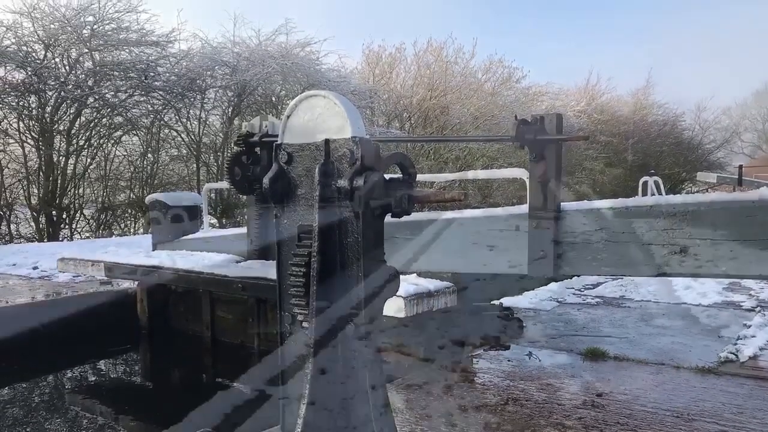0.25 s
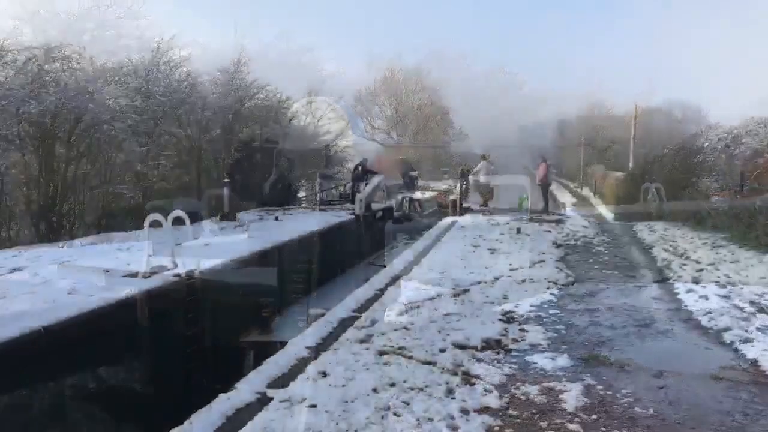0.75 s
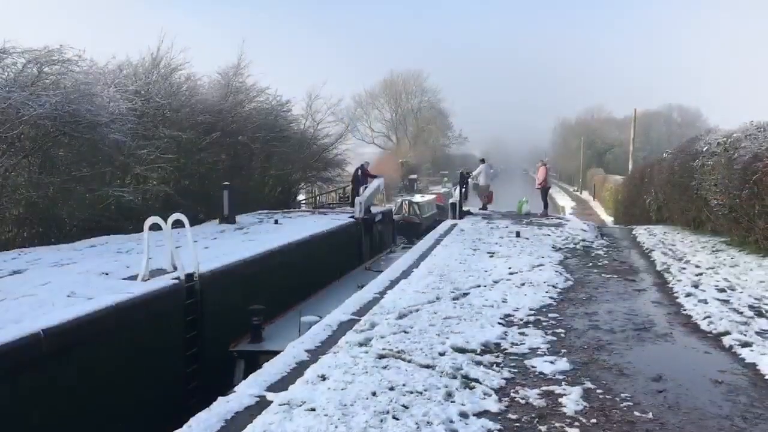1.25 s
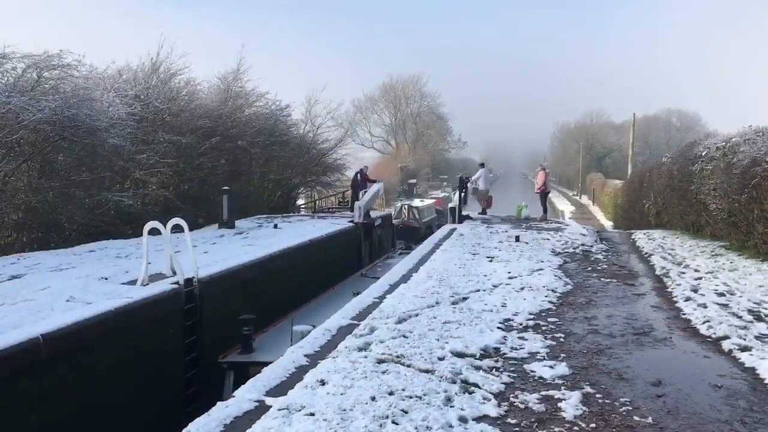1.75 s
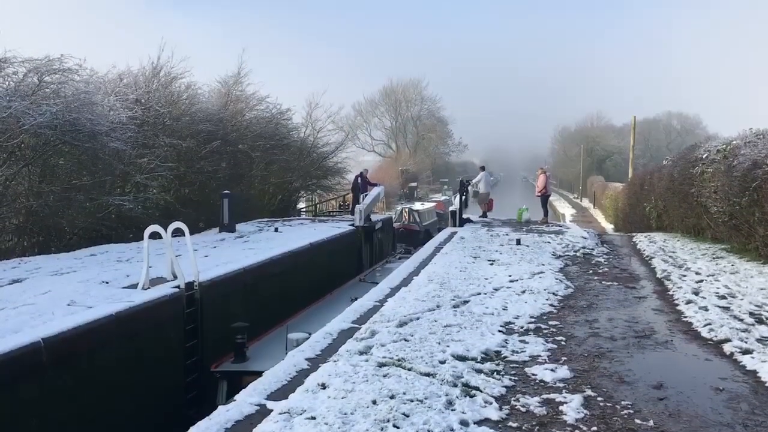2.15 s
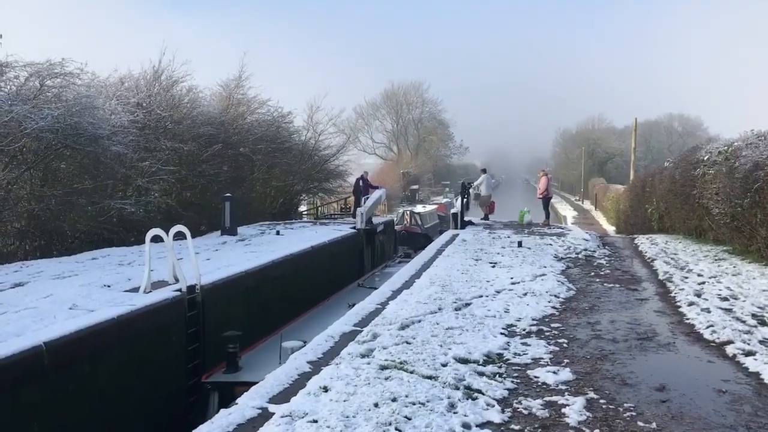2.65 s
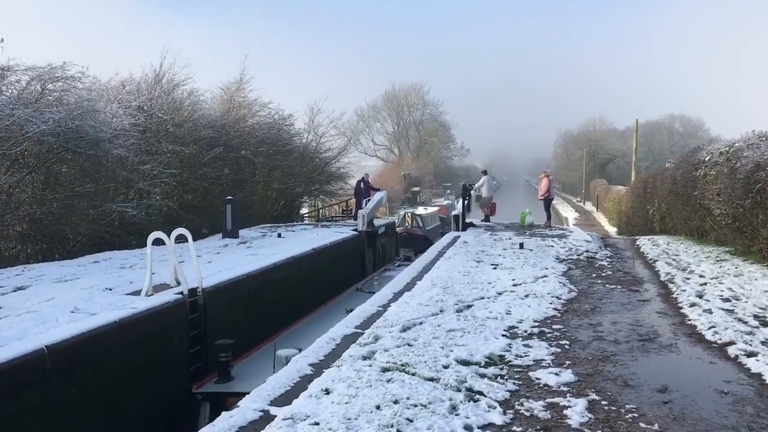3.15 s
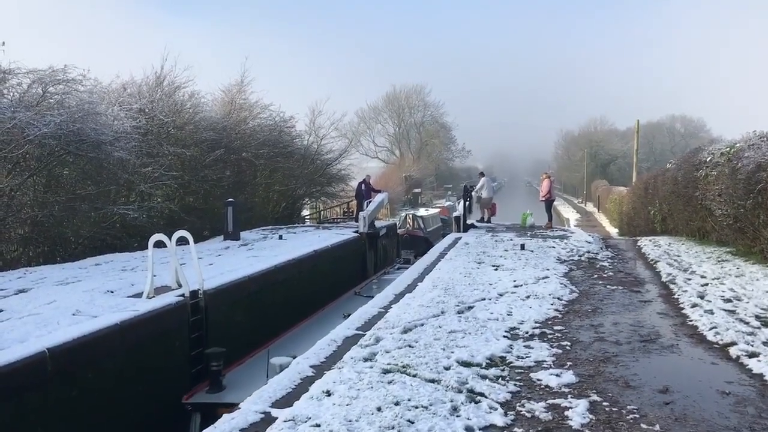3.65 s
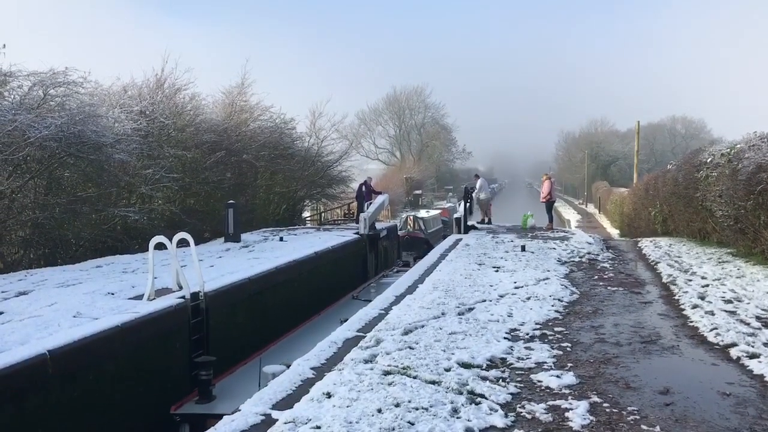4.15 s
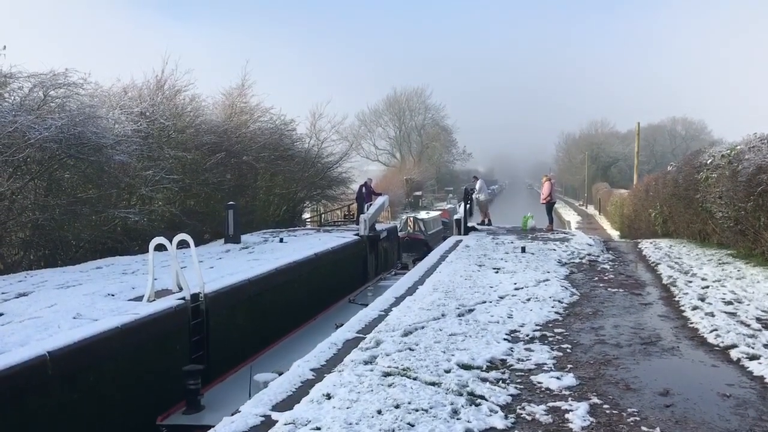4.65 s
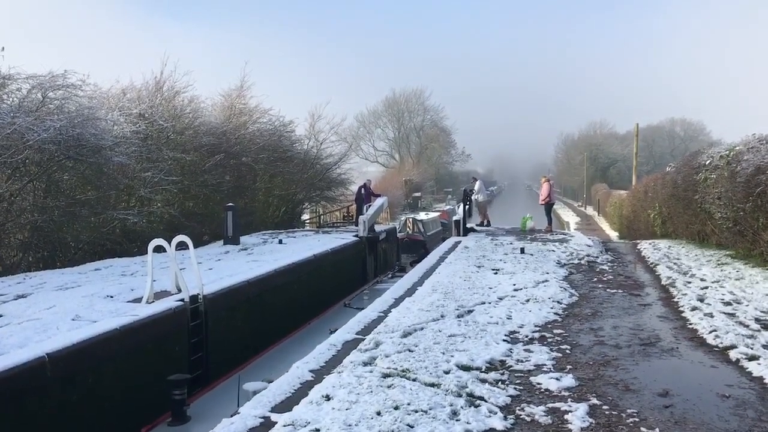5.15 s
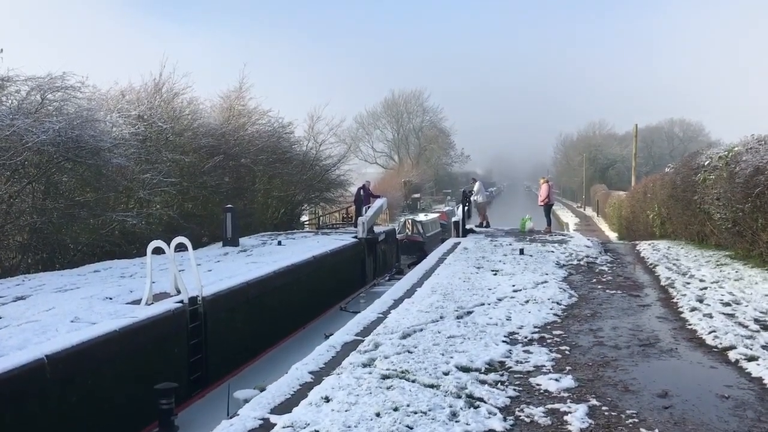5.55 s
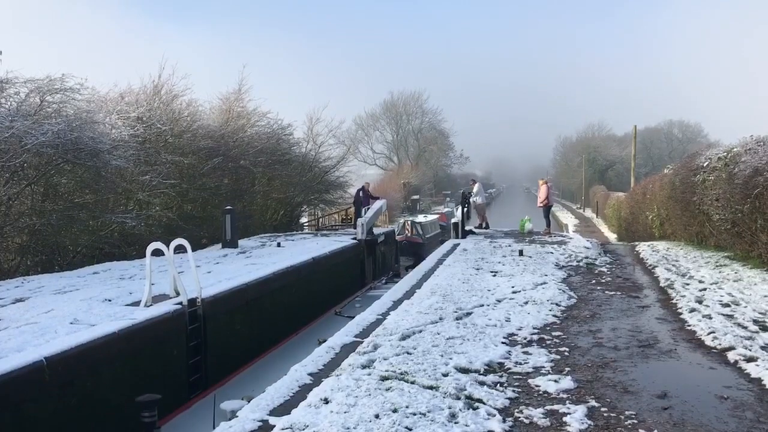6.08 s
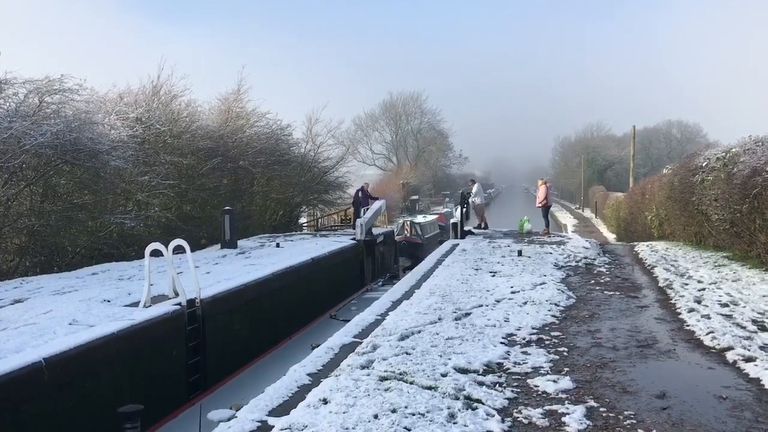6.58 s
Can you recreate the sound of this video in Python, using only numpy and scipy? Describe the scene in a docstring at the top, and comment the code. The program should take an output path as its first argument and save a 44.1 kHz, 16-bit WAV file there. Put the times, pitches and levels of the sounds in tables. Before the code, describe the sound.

The scene fades in from silence during the first second. Water leaking through a canal lock splatters without pause: dense tiny ringing bubbles, rounder plinks and a smooth spray hiss, ebbing slightly and gushing briefly near 1.2, 2.4, 3.8 and 5.1 s. Small wet slaps crack over it, busiest around 0.7-1.3 and 2.1-2.9 s. Beneath, a boat diesel idles at about 28 deep puffs per second, swelling by 3.4 s, with low water churn. Quick, mostly falling bird chirps come at 0.6, 1.4, 2.1, 2.5 and 4.5 s, then more often from 5.8 s, lightly scattered by trees. Soft low gulps thump around 2.4-2.7, 3.2 and 4.0 s. The leak eases near 5.6 s and recovers. Around 6.4 s the engine sags, then revs sharply from 6.6 s, booming through the exhaust with a droning steel hull, rising to the end. Mono, outdoors, with muted extreme treble.

```python
"""A canal lock, fading in over the first second. From the start, leaking water splatters as ringing bubbles and hiss,
a diesel idles as puffs through exhaust resonances, and filtered noise churns low in the chamber.
Birds soon chirp as gliding sines; clumps of water slap, and later pockets of air gulp as swelling low sines.
Near the end the hull drones as resonant noise; the engine sags under load, then revs through its exhaust boom."""
import sys
import numpy as np
from scipy import signal
from scipy.fft import rfft, irfft
from scipy.io import wavfile
from scipy.ndimage import uniform_filter1d, map_coordinates

SR = 44100
rng = np.random.default_rng(int(sys.argv[2]) if len(sys.argv) > 2 else 0)


def dump_mix(stems):
    """Bounce the given channels to the path in sys.argv[1] as a 16-bit WAV at rate SR."""
    frames = np.atleast_2d(stems).T  # one column per channel
    limited = np.clip(frames, -1, 1)  # hard clip at full scale
    pcm = np.round(limited * 32767).astype(np.int16)
    wavfile.write(sys.argv[1], SR, pcm)


N = 300699

# diesel idles, sags as it takes the load, then revs: t/s, firing rate/Hz
ENGINE_SPEED = [(0, 28.3), (5.45, 28.36), (5.8, 28.88), (6.22, 28.64), (6.38, 27), (6.52, 27.84),
                (6.64, 31.2), (6.69, 37.5), (6.76, 40.6), (6.81, 48.5)]


def undb(db):
    """Decibels to gain."""
    return 10 ** (np.asarray(db) / 20)


def unit(x):
    """Scale to an rms of one."""
    return x / np.sqrt(np.mean(x ** 2) + 1e-18)


def curve(rows):
    """Join (t/s, value) rows by straight lines in time."""
    return np.interp(np.arange(N) / SR, *np.transpose(rows))


def colour(x, points):
    """Filter by (f/Hz, gain/dB) points, joined along log frequency."""
    point_hz, point_db = np.transpose(points)
    f_hz = np.maximum(np.fft.rfftfreq(2 * N, 1 / SR), 1)
    gain_db = np.interp(np.log(f_hz), np.log(point_hz), point_db)
    return irfft(rfft(x, 2 * N) * undb(gain_db))[:N]


def ring(x, hz, width_hz):
    """One resonance, gain 1 at its centre."""
    b, a = signal.iirpeak(hz, hz / width_hz, fs=SR)
    return signal.lfilter(b, a, x)


def ring_twice(x, hz, width_hz):
    """The same resonance in two passes, for steeper skirts."""
    return ring(ring(x, hz, width_hz), hz, width_hz)


def walk(knots_per_s):
    """Smooth random wander, rms one."""
    knots = rng.standard_normal(4096)
    position = np.arange(N) / SR * knots_per_s
    return unit(map_coordinates(knots, [position], order=2, mode="wrap"))


def impacts(per_s, spread_db):
    """Impulses at random instants, 8192 at most, of very uneven size."""
    count = int(per_s * N / SR)
    draws = rng.random((8192, 2))[:count]
    instants = (draws[:, 0] * N).astype(int)
    x = np.zeros(N)
    x[instants] = undb(-spread_db * np.log(np.maximum(draws[:, 1], .01)))
    return x


def decay(x, decay_s):
    """Let every impulse die away exponentially."""
    keep = np.exp(-1 / (decay_s * SR))
    return signal.lfilter([1 - keep], [1, -keep], x)


def smear(x, wet_db=-9):
    """Every drop falls somewhere else, so its reflections follow as a short wash of noise."""
    envelope = np.sqrt(decay(x ** 2, .008))
    return x + undb(wet_db) * envelope * rng.standard_normal(N)


def surge(column):
    """Level change in dB from gushes of water, each one smooth arch."""
    # t/s, length/s, splatter change/dB, spray change/dB
    gushes = [(.93, 0.18, 0, 0.5), (1.204, 0.17, 1, 2.5), (2.41, 0.17, 2.5, 1.5), (3.765, 0.19, 2.5, -2),
              (5.099, 0.14, .5, 3.5), (5.258, 0.17, 0.8, -1)]
    t = np.arange(N) / SR
    total_db = 0
    for row in gushes:
        progress = np.clip((t - row[0]) / row[1], 0, 1)
        total_db = total_db + row[column] * np.sin(np.pi * progress)
    return total_db


def leak(drops_per_s_at_3khz=850, spread_db=2.0, clumps_per_s_per_band=20, clump_db=-3, flicker_db=1.35,
         drop_q=6, plink_db=-8, hiss_db=-1.5, splatter_db=-46, spray_db=-46.5, spray_flow_share=.4):
    """The jet breaks into clumps; each drop rings a tiny bubble for a few cycles, over a smooth hiss of spray."""
    # leak strength, slackening now and then: t/s, level change/dB
    flow = [(1.4, -0.5), (1.7, 0), (2.2, .5), (3.2, -0.1), (3.8, -0.5), (4.0, -1), (4.6, 0.5), (5.35, 0.2),
            (5.62, -1.5), (6.1, -0.15), (6.8, 1)]
    # colour of the falling water: f/Hz, gain/dB
    water_spectrum = [(210, -29.5), (350, -5), (522, -3.5), (607, -1), (757, -4), (1570, 0.5), (1830, -2),
                      (2250, 2), (2610, 0), (3210, 1.5), (4850, -4), (5490, -1.5), (8540, -8), (9020, -8),
                      (9400, -77.5), (12200, -54.5), (20700, -120)]
    pitches_hz = np.geomspace(400, 9000, num=24)
    # a clump lands at once, dies in milliseconds and stirs a range of neighbouring bubble sizes
    clumps = np.array([decay(impacts(clumps_per_s_per_band, 2.4), .0025) for _ in pitches_hz])
    clumps = uniform_filter1d(clumps, size=7, axis=0)
    bubbles = 0
    for hz, clump in zip(pitches_hz, clumps):
        drops_per_s = drops_per_s_at_3khz * (hz / 3000) ** .5
        drops = ring(impacts(drops_per_s, spread_db), hz, hz / drop_q)
        # rarer, rounder bubbles ring on
        plinks = ring(impacts(6, 2.2), hz, hz / 65)
        # clumps trap mostly middle-sized bubbles; the finest spray falls more evenly
        clump_share = undb(clump_db - 2 * np.log2(hz / 2400) ** 2)
        stir = (1 + clump_share * unit(clump)) * undb(flicker_db * walk(30))
        bubbles = bubbles + np.sqrt(hz) * (unit(drops * stir) + undb(plink_db) * unit(plinks))
    jet_flutter = undb(0.37 * walk(130))
    wet_bubbles = unit(smear(bubbles * jet_flutter))
    hiss = undb(hiss_db) * rng.standard_normal(N)
    water = colour(wet_bubbles + hiss, water_spectrum)
    # heavy low splatter follows the flow fully, fine high spray less so
    splatter = colour(water, [(3000, 0), (5000, -20), (9000, -50)])
    spray = water - splatter
    flow_db = curve(flow)
    splatter_gain = undb(splatter_db + flow_db + surge(column=2))
    spray_gain = undb(spray_db + spray_flow_share * flow_db + surge(column=3))
    return unit(splatter) * splatter_gain + unit(spray) * spray_gain


def diesel(scatter_db=1.5, reference_hz=28.9, rev_db_per_octave=13, boom_hz=82, boom_half_width_hz=7.5, boom_db=11.5):
    """Each firing sends a puff down the exhaust; revving drives the second harmonic into the pipe's boom."""
    # exhaust and lock chamber resonances, lowest first: f/Hz, width of each pass/Hz, relative gain/dB
    resonances = [(57.6, 17.6, 4), (79.4, 21.6, 5), (117, 23, -20), (140, 36, -17), (198, 19, -22.5),
                  (227.9, 12, -20), (296.3, 49, -31)]
    # share of the deepest resonance as the boat shifts in the chamber: t/s, gain/dB
    depth = [(.3, -5), (1.2, -1.5), (2.2, 0), (5, 4.5), (5.8, -4), (6.5, -2)]
    # exhaust level at the reference rate, as the boat shifts in the chamber: t/s, level/dB
    throb = [(1, -39), (3.4, -34.5), (5.6, -35.5), (6.3, -36.5)]
    speed_hz = curve(ENGINE_SPEED)
    firings = np.diff(np.floor(np.cumsum(speed_hz) / SR), prepend=0)
    puffs = firings * undb(scatter_db * walk(28))
    modes = []
    for k, (hz, width_hz, db) in enumerate(resonances):
        polarity = (-1) ** k
        modes.append(polarity * undb(db) * ring_twice(puffs, hz, width_hz))
    pipe = modes[0] * undb(curve(depth)) + sum(modes[1:])
    # dividing by the running rms leaves the level to throb, effort and boom
    running_rms = np.sqrt(uniform_filter1d(pipe ** 2, SR // 14) + 1e-14)
    effort_db = rev_db_per_octave * np.log2(speed_hz / reference_hz)
    # the second resonance swells as twice the firing rate nears the boom
    boom_gain_db = boom_db / (1 + ((2 * speed_hz - boom_hz) / boom_half_width_hz) ** 2)
    booming_pipe = pipe + (undb(boom_gain_db) - 1) * modes[1]
    return booming_pipe / running_rms * undb(curve(throb) + effort_db)


def churn(level_db=-47.5, surge_db=0.8):
    """Water tumbles low in the chamber: coloured noise, surging at random."""
    # colour of the churning: f/Hz, gain/dB
    churn_spectrum = [(20, -5), (35, -10), (48, -3), (70, 3), (105, 0.5), (140, -1), (200, -5.5),
                      (290, -10), (400, -19.5), (700, -40)]
    tumble = unit(colour(rng.standard_normal(N), churn_spectrum))
    return tumble * undb(level_db + surge_db * walk(9))


def echo(x, t60_s, wet_db):
    """Add a diffuse tail of reflections: decaying noise after a 4 ms gap."""
    t = np.arange(SR // 2) / SR
    tail = rng.standard_normal(len(t)) * undb(-60 * t / t60_s) * (t > .004)
    tail = tail / np.linalg.norm(tail)
    return x + undb(wet_db) * signal.fftconvolve(x, tail)[:N]


def birds():
    """Quick whistles dwell on a note, slur (mostly down) and settle; they flutter, and the trees scatter them."""
    # t/s, length/s, start f/Hz, end f/Hz, level/dB
    chirps = [(.195, .049, 5480, 5300, -44), (0.628, .045, 4190, 3650, -40.5),
              (1.093, .037, 3850, 3870, -46), (1.44, 0.072, 4200, 2950, -43.5),
              (2.116, 0.089, 4803, 3290, -43), (2.511, .13, 4930, 3455, -44),
              (4.547, 0.074, 4640, 2840, -41.5), (5.162, 0.022, 5640, 5800, -47),
              (5.767, 0.076, 4610, 3050, -43), (5.828, 0.042, 3440, 3460, -43.5),
              (6.313, 0.054, 5220, 4500, -45.5), (6.381, 0.075, 4690, 3740, -46),
              (6.457, 0.02, 4600, 4700, -48), (6.721, 0.06, 5130, 4120, -42.5),
              (6.792, .028, 4750, 4650, -46)]
    out = np.zeros(N)
    pitch_wander = 1 + .055 * walk(400)
    flutter = undb(3.3 * walk(120))
    for start_s, length_s, start_hz, end_hz, db in chirps:
        span = np.arange(int(start_s * SR), min(int((start_s + length_s) * SR), N))
        u = (span - span[0]) / (length_s * SR)
        slur = (1 - np.cos(np.pi * u)) / 2
        # the steep part buzzes, the level ends are nearly pure
        buzz = .25 + 2.8 * abs(np.log(end_hz / start_hz)) * np.sin(np.pi * u)
        hz = start_hz * (end_hz / start_hz) ** slur * pitch_wander[span] ** buzz
        shape = unit(signal.windows.tukey(len(span), .3) * flutter[span])
        whistle = np.sin(2 * np.pi * np.cumsum(hz) / SR)
        out[span] += undb(db) * shape * whistle
    return echo(out, t60_s=.16, wet_db=-7)


def splats(trim_db=-1, slap_s=.0022, attack_s=.00027, crack_db=-23, spatter_db=-13, spatter_s=.014,
           bubble_db=-13, bubble_cycles=22, rise_per_s=3):
    """A clump slaps the surface: a crack coloured by the air it traps, a rising bubble, a spatter of droplets."""
    # loudest splats: t/s, level before trim/dB, centre f/Hz
    splat_rows = [(0.7108, -27.5, 5310), (0.9316, -30, 2230), (0.9986, -28, 1980), (1.1332, -30, 2390),
                  (1.2276, -31.5, 2200), (1.257, -28.5, 6110), (1.2852, -29.5, 1880), (1.3012, -26, 2900),
                  (2.0632, -30.5, 1598), (2.2613, -29, 4120), (2.3697, -26.5, 1900), (2.4219, -29, 1690),
                  (2.4422, -29.5, 5360), (2.4987, -31.5, 2470), (2.7044, -31, 2300), (2.8435, -29, 2080),
                  (2.8935, -33, 4100), (3.3576, -32.5, 2200), (3.5089, -31, 3130), (3.7344, -28, 3080),
                  (3.8156, -30, 1750), (4.7353, -30, 5690), (5.2896, -31, 2280), (5.379, -32, 2280),
                  (5.4216, -29.5, 2223), (6.0475, -32, 1455)]
    out, t = np.zeros(N + SR), np.arange(SR // 12) / SR
    for start_s, db, hz in splat_rows:
        slap = rng.standard_normal(len(t)) * np.exp(-t / slap_s) * (1 - np.exp(-t / attack_s))
        sparse_noise = rng.standard_normal(len(t)) * (rng.random(len(t)) < 1500 / SR)
        droplets = unit(sparse_noise) * np.exp(-t / spatter_s)
        crack = slap + undb(spatter_db) * droplets
        splat = ring_twice(crack, hz, min(.8 * hz, 2000)) + undb(crack_db) * crack
        crest = 2.2 * np.std(splat[t < .004])  # estimated peak
        bubble_phase = 2 * np.pi * hz * t * (1 + rise_per_s * t / 2)
        bubble = np.exp(-t * hz / bubble_cycles) * np.sin(bubble_phase)
        start = int(start_s * SR)
        out[start:][:len(t)] += undb(db + trim_db) * (splat / crest + undb(bubble_db) * bubble)
    return out[:N]


def gulps(swell_s=0.039):
    """Big pockets of air gulp under the gate: low sines that swell and die briefly."""
    # t/s, f/Hz, peak level/dB
    gulp_rows = [(2.4, 48, -46), (2.583, 47.6, -38), (2.7, 59, -41), (3.18, 43.4, -48), (4.0, 43.9, -45)]
    out, t = np.zeros(N + SR), np.arange(SR // 3) / SR
    shape = t / swell_s * np.exp(1 - t / swell_s)
    for start_s, hz, db in gulp_rows:
        start = int(start_s * SR)
        out[start:][:len(t)] += undb(db) * shape * np.sin(2 * np.pi * hz * t)
    return out[:N]


def hull(full_db=-42.5, onset_hz=28.8, full_hz=31.8):
    """Steel plates ring to random shaking, from the onset firing rate up to a full drone at full_hz."""
    # hull modes: f/Hz, width of each pass/Hz, relative gain/dB
    hull_modes = [(151, 36, 1.5), (268, 34, -4.5), (322, 28, -2)]
    shake = rng.standard_normal(N)
    drone = sum(undb(db) * ring_twice(shake, hz, width_hz) for hz, width_hz, db in hull_modes)
    load = np.clip((curve(ENGINE_SPEED) - onset_hz) / (full_hz - onset_hz), 0, 1)
    return unit(drone) * load * undb(full_db)


def scene():
    """Sum of water, boat and birds, one channel."""
    return (leak() + splats() + gulps() + diesel() + hull() + churn() + birds())[None]


def record(dry, fade_start_s=0.068, fade_s=0.95, top_hz=9330):
    """Fade in linearly, then cut the treble with a steep low-pass."""
    fade = np.clip((np.arange(N) / SR - fade_start_s) / fade_s, 0, 1)
    low_pass = signal.ellip(12, .2, 80, top_hz, fs=SR, output="sos")
    return signal.sosfilt(low_pass, dry * fade)


dry = scene()
out = record(dry)
dump_mix(out)
```